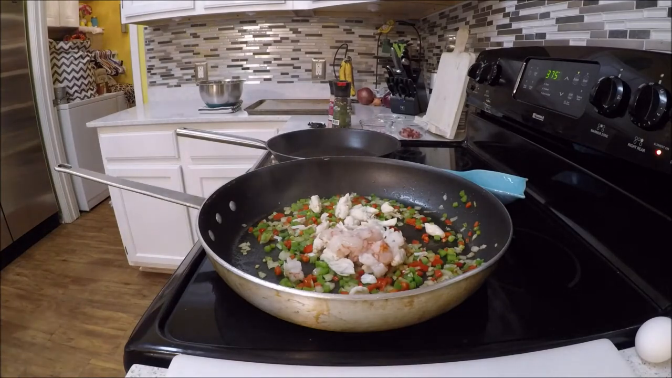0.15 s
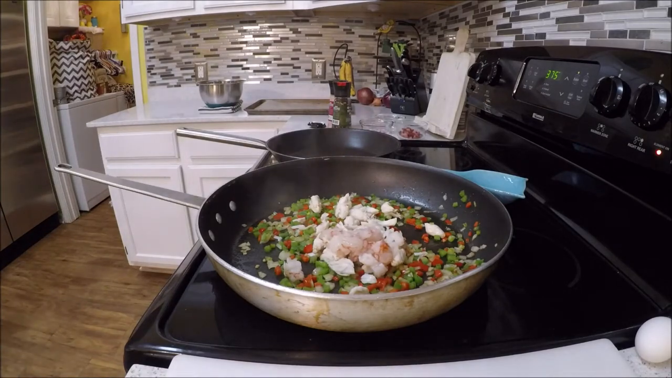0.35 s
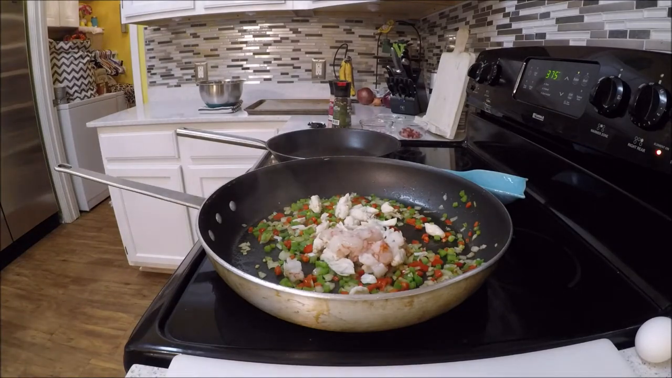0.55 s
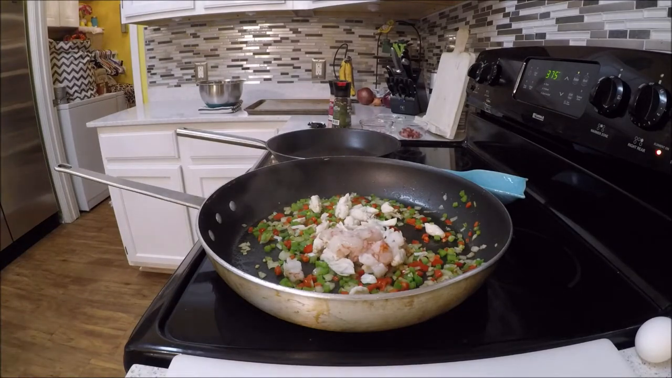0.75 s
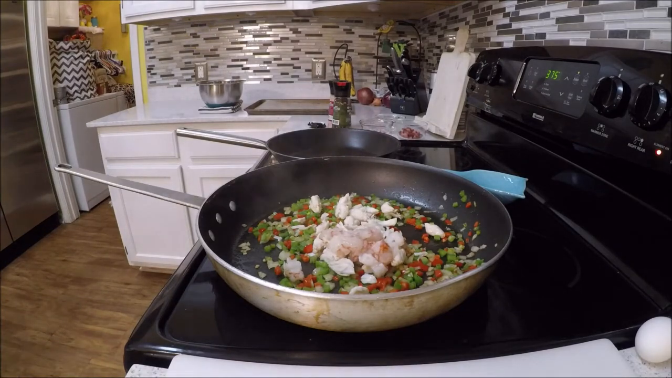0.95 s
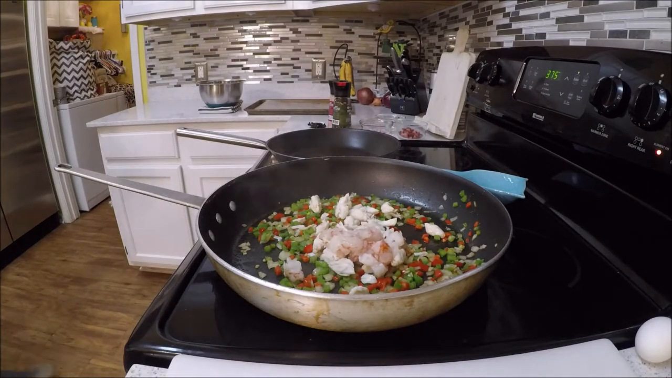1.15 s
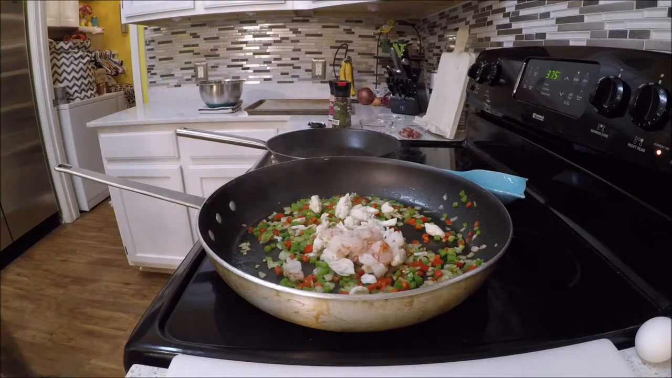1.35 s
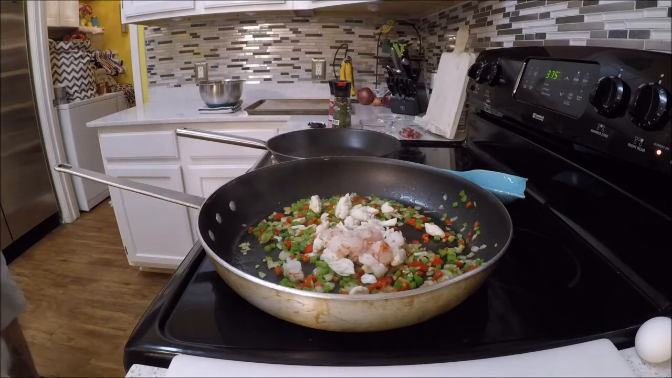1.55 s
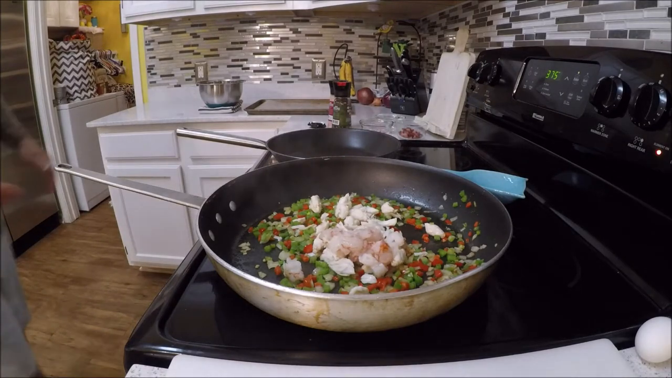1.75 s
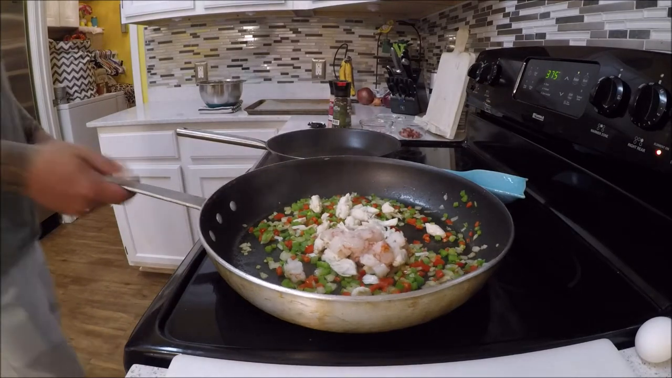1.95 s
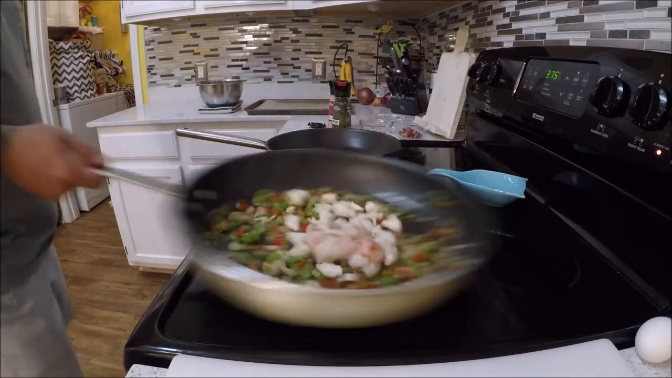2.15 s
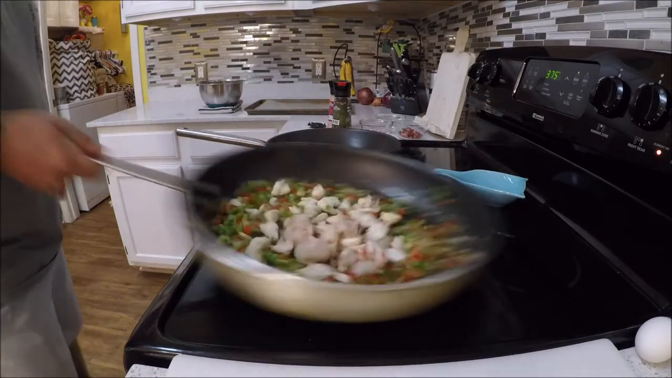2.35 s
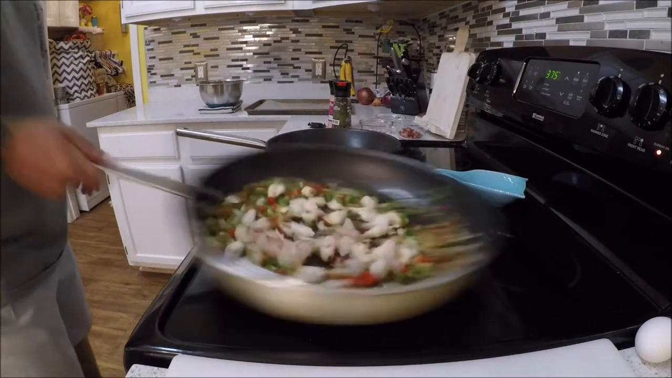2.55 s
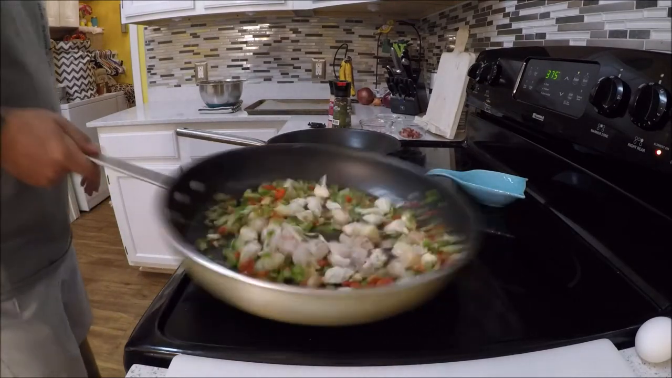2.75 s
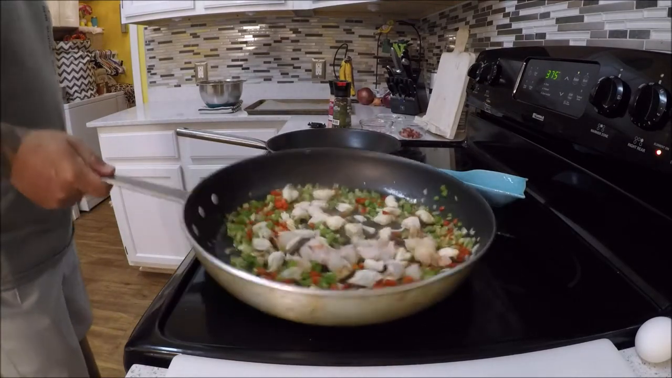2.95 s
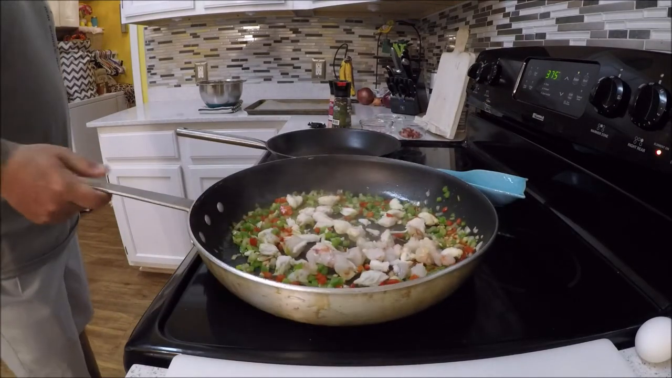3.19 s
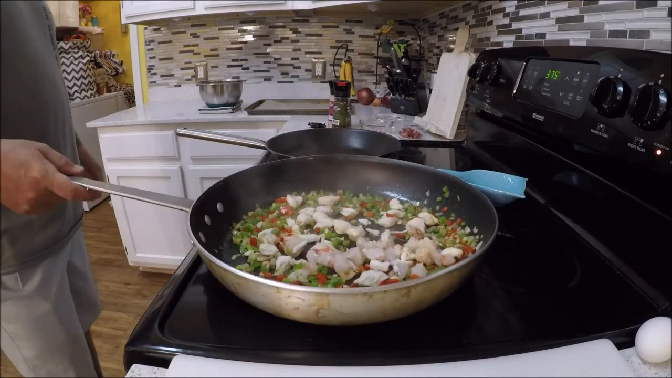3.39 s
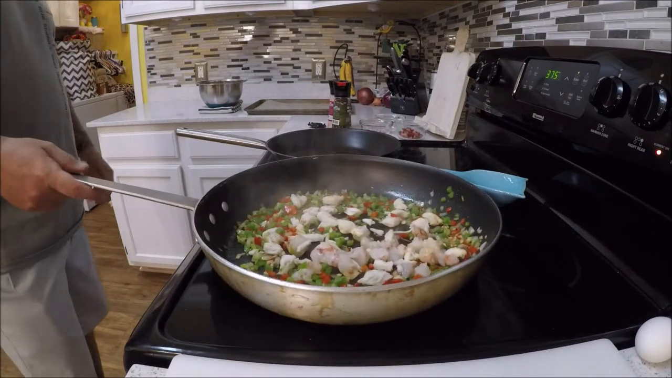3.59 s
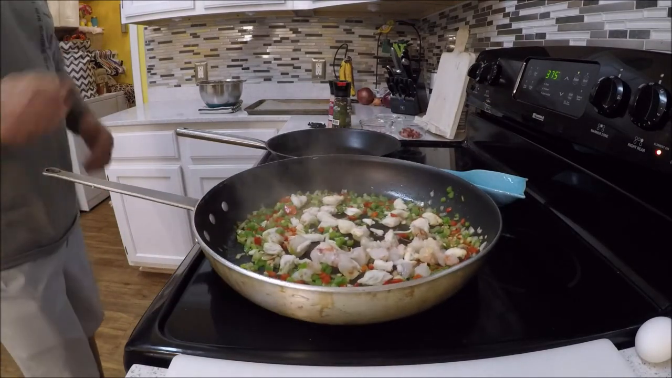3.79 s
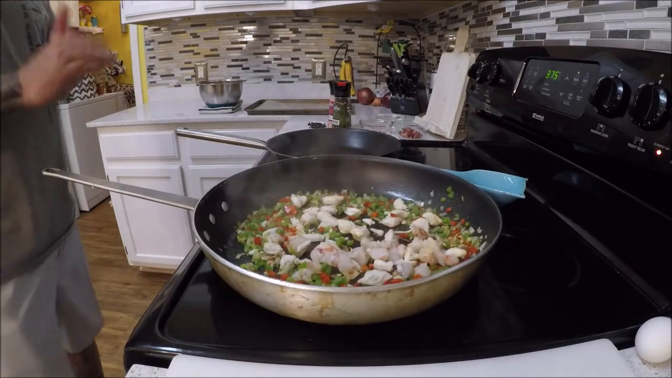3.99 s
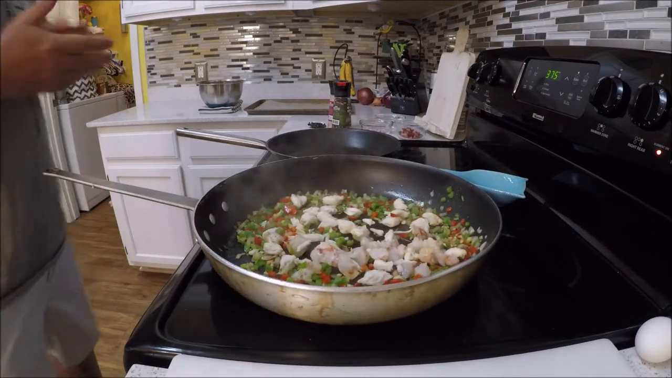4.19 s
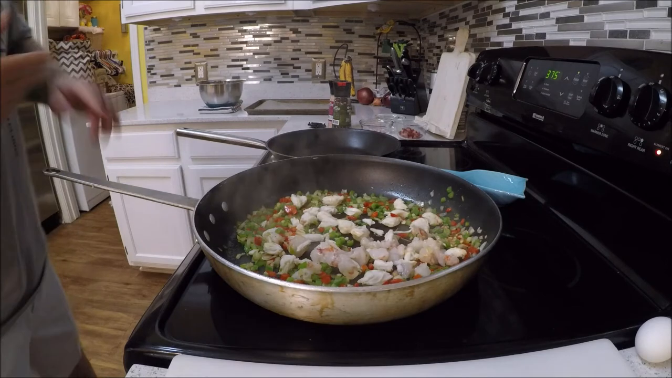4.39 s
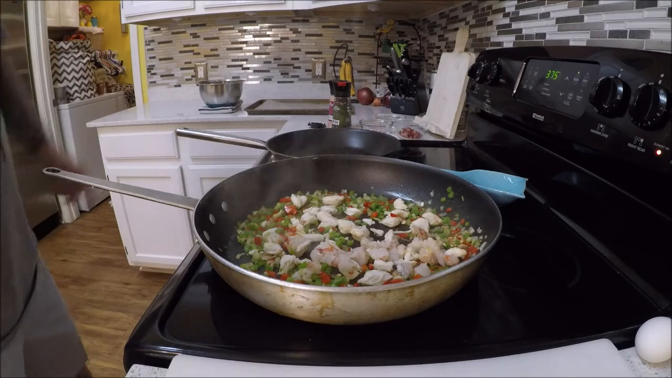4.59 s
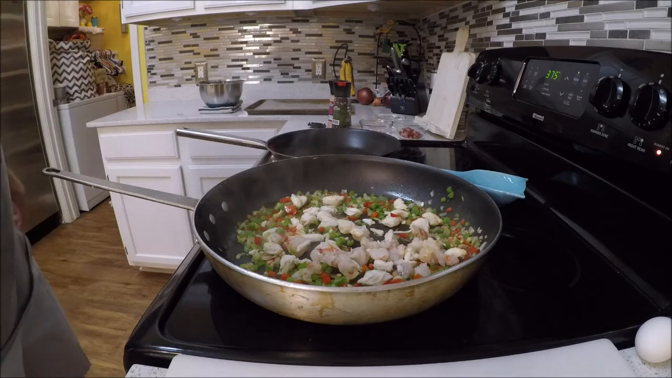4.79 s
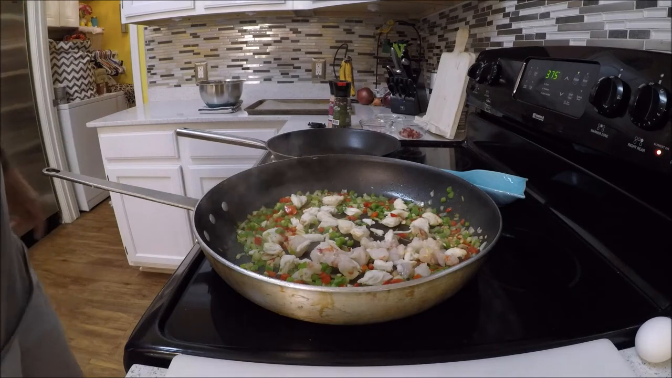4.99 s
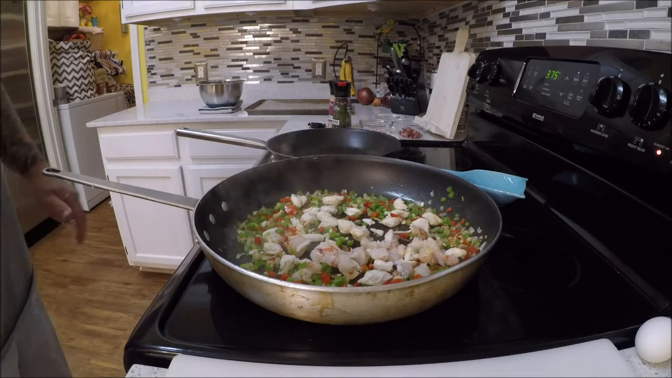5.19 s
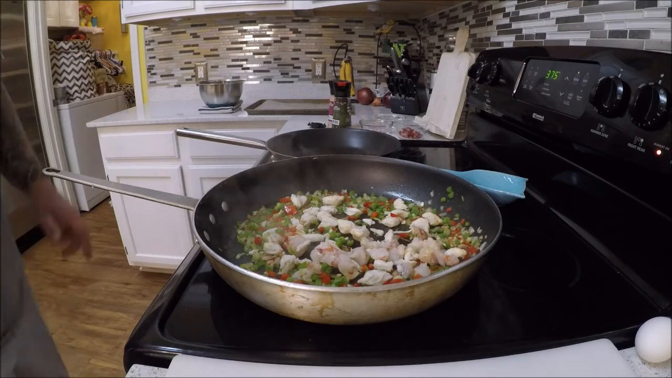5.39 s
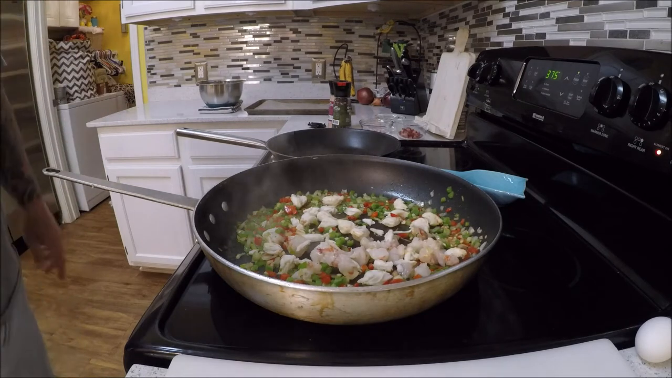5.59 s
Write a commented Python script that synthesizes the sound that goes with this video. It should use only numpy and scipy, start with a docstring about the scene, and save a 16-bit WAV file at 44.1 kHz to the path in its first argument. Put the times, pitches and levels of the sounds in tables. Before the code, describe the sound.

Shrimp and vegetables sizzle steadily in a skillet over the low hum of a kitchen fan. Something hard clatters across the room and a few soft steps follow. Then the pan is shaken on the glass stove top, knocking and scraping as the sizzle flares, and lands with a crack and a metallic boom. The frying carries on, with one more faint step. The stereo microphone is close to the stove.

```python
"""A kitchen, a stereo microphone close to a glass-top stove. Shrimp and vegetables sizzle in a skillet,
steam bubbles bursting in the oil, over the hum of a fan. Something hard is put down across the room,
and the cook takes a few soft steps. From about 2 s the skillet knocks and scrapes to and fro on the
glass and the sizzle flares. Just after 3 s the pan lands with a crack that sets the stove's sheet metal
booming. The frying goes on through one more step, and near 4.6 s the sound cuts out for an instant."""
import sys
import numpy as np
from scipy import signal
from scipy.fft import rfft, irfft
from scipy.io import wavfile
from scipy.ndimage import uniform_filter1d

SR = 44100
rng = np.random.default_rng(int(sys.argv[2]) if len(sys.argv) > 2 else 0)


def materialize(psi):
    """Save the field psi as 16-bit PCM at rate SR to the path in sys.argv[1].

    A 1-D psi becomes a single channel; in a 2-D psi each row is a channel.
    """
    bounded = np.clip(np.atleast_2d(psi).T, -1, 1)
    quanta = np.round(bounded * 32767).astype(np.int16)
    wavfile.write(sys.argv[1], SR, quanta)


N = 248724
T = np.arange(N) / SR
HZ = np.fft.rfftfreq(N, 1 / SR)

# the colour of frying: (frequency [Hz], level [dB per Hz])
SIZZLE_SPECTRUM = [(300, -32), (500, -16), (700, -16), (1200, -20), (1550, -10), (2000, -6.5), (3300, -2),
                   (5100, -2), (5950, 3), (6900, -2.5), (7750, -7), (8500, -15), (10500, -20.5),
                   (13000, -20.5), (15200, -30)]
# stereo width of the frying at the microphone: (frequency [Hz], side over mid [dB])
SIZZLE_WIDTH = [(60, -3), (99, -4), (160, -13), (270, -13), (450, -2), (740, 5.5), (1220, -6.5),
                (2010, -9.5), (3330, -19), (5500, -8), (9080, 0), (15000, -12.5)]
# stereo width of the room's reflections: (frequency [Hz], side over mid [dB])
ROOM_WIDTH = [(40, -24), (80, 0), (140, -15), (280, -14), (600, -8.5), (1300, -1), (3000, -5.5),
              (7000, -2.5)]

SHAKE_START_S, SHAKE_BUILD_S, SHAKE_HOLD_S, SHAKE_EASE_S = 1.93, 0.3, 0.49, 0.47
SET_DOWN_S = 3.13


def gain_of(db):
    """Decibels to amplitude."""
    return 10 ** (np.asarray(db) / 20)


def unit_rms(x):
    """Scales to rms 1."""
    return x / np.sqrt(np.mean(x ** 2) + 1e-20)


def unit_energy(x):
    """Scales to energy 1."""
    return x / np.linalg.norm(x)


def curve_at(points, hz):
    """Reads a table on a log-frequency axis."""
    f, value = np.transpose(points)
    return np.interp(np.log(hz + 1), np.log(f + 1), value)


def ramp(s, start, length):
    """Goes from 0 to 1 over a length of time."""
    return np.clip((s - start) / length, 0, 1)


def add(mix, s, sound):
    """Mixes a sound in at s seconds."""
    part = mix[round(s * SR):][:len(sound)]
    part += sound[:len(part)]


def through(x, response):
    """Convolution, cut to the length of x."""
    return signal.fftconvolve(x, response)[:len(x)]


def coloured(x, spectrum):
    """Filters x by a spectrum, to rms 1."""
    hz = np.fft.rfftfreq(len(x), 1 / SR)
    return unit_rms(irfft(rfft(x) * gain_of(curve_at(spectrum, hz)), len(x)))


def low_cut(x, hz):
    """Small objects radiate almost no deep bass."""
    return signal.sosfilt(signal.butter(8, hz, "high", fs=SR, output="sos"), x + 1e-12)


def drift(rate_hz):
    """A slow random wander of rms 1."""
    return unit_rms(irfft(rfft(rng.standard_normal(N)) / (1 + (HZ / rate_hz) ** 4), N))


def clicks(per_s, spread_db, size=N):
    """Random clicks of uneven height, at rms 1."""
    height = gain_of(spread_db * np.minimum(rng.exponential(1, size), 6))
    return unit_rms(height * rng.choice([-1, 1], size) * (rng.random(size) < per_s / SR))


def puff(spectrum, decay_s):
    """A short burst of coloured noise that dies away."""
    t = T[:SR // 5]
    return coloured(rng.standard_normal(len(t)), spectrum) * np.exp(-t / decay_s)


def ringing(modes):
    """A struck object's modes, each starting from rest; the wider ones die sooner."""
    t = T[:SR]
    return unit_energy(sum(
        (-1) ** k * gain_of(db) * width * np.exp(-np.pi * width * t) * np.sin(2 * np.pi * hz * t)
        for k, (hz, width, db) in enumerate(modes)))


def kitchen_echo():
    """The room's response: each band dies at its own speed."""
    # reverberation: (frequency [Hz], t60 [s])
    decay_times = [(100, 1), (300, 0.59), (1000, 0.48), (3500, 0.51), (8000, 0.052), (16000, 0.023)]
    hz, t, bands = signal.stft(rng.standard_normal(SR), SR, nperseg=256)
    decay = 1000. ** (-t / curve_at(decay_times, hz)[:, None])
    return unit_energy(signal.istft(bands * decay, SR, nperseg=256)[1])


def stereo(mid, width, left_db):
    """Scattered reflections make the microphone's two channels differ."""
    scatter = rfft(rng.standard_normal(N) * np.exp(-T / 0.0108))
    side = irfft(rfft(mid) * scatter / abs(scatter) * gain_of(curve_at(width, HZ)), N)
    return np.array([(mid + side) * gain_of(left_db / 2), (mid - side) * gain_of(-left_db / 2)])


def vigour(s):
    """How hard the pan is shaken, 0-1: it builds, holds and eases off."""
    ease_from_s = SHAKE_START_S + SHAKE_BUILD_S + SHAKE_HOLD_S
    return ramp(s, SHAKE_START_S, SHAKE_BUILD_S) - ramp(s, ease_from_s, SHAKE_EASE_S)


def bubbles():
    """Thousands of steam bubbles burst each second, a few spit, and the room blurs the rest to a hiss."""
    bursts = clicks(per_s=7000, spread_db=3.2)
    spits = gain_of(-12) * clicks(per_s=160, spread_db=2.8)
    hiss = gain_of(4) * rng.standard_normal(N)
    return coloured(bursts + spits + hiss, SIZZLE_SPECTRUM)


def sizzle():
    """Close by, the frying flares with the shake, which thins out the large, lower bubbles."""
    rest_db, flare_db, fresh_db = -31, 8.5, 0.5
    heaped_db, spread_db, shaken_db = 1.1, -3, -1  # large bubbles, by how the wet food lies
    # set down again, the freshly turned food fries harder for a while
    fresh = ramp(T, SET_DOWN_S, length=0.22) * np.exp(-np.maximum(T - SET_DOWN_S, 0) / 0.8)
    level_db = rest_db + flare_db * vigour(T) + fresh_db * fresh
    spread = ramp(T, SHAKE_START_S + SHAKE_BUILD_S, length=0.055)
    large_db = heaped_db + (spread_db - heaped_db + shaken_db * vigour(T)) * spread
    mid = bubbles()
    side = irfft(rfft(bubbles()) * gain_of(curve_at(SIZZLE_WIDTH, HZ)), N)
    pair = np.array([mid + side, mid - side])
    large_bubbles = irfft(rfft(pair) / (1 + (HZ / 4500) ** 6), N)
    flutter_db = 0.5 * drift(rate_hz=25)
    return (pair + (gain_of(large_db) - 1) * large_bubbles) * gain_of(level_db + flutter_db)


def fan():
    """The kitchen fan, a steady bed: wavering tones in a low rush of air."""
    # its hum: (frequency [Hz], level [dB])
    tones = [(172, -51), (204.6, -42.5), (238, -55), (393, -56), (407, -52)]
    # its rush of air: (frequency [Hz], level [dB per Hz])
    air_spectrum = [(30, -51), (105, -36), (145, 6.5), (190, 4.5), (245, 4), (320, -1.5), (410, 2),
                    (480, -7), (800, -8), (1500, -9.5), (4000, -33)]
    hum = np.zeros(N)
    for hz, db in tones:
        amplitude = np.sqrt(2) * gain_of(db + 1.9 * drift(rate_hz=3.5))
        hum += amplitude * np.sin(2 * np.pi * hz * T + 0.56 * drift(rate_hz=0.94))
    air = gain_of(-44.5) * coloured(rng.standard_normal(N), air_spectrum)
    return stereo(gain_of(0.3) * hum + air, ROOM_WIDTH, left_db=-1.8)


def clatter():
    """Across the room a hard thing lands and rattles; it arrives echoing, without the highest treble."""
    # its bounces: (time [s], relative level [dB])
    bounces = [(0.3117, -8.5), (0.3233, -2), (.336, -8), (.370, -9.5), (.403, -7.5)]
    # its ring: (frequency [Hz], width [Hz], level [dB])
    modes = [(289, 49, -1.5), (530, 51, -5.5), (796, 56, 2), (855, 57, 1.5), (1133, 97, 0), (1420, 65, -8),
             (1932, 46, 1), (2010, 62, -9), (2700, 67, -14), (3500, 39, -4.5), (5980, 51, 0)]
    # the noise of contact: (frequency [Hz], level [dB per Hz])
    contact_spectrum = [(100, -32), (145, 0), (300, -6), (420, -0.5), (620, -5), (800, -9), (1000, -0.5),
                        (1200, -1.5), (2000, -1.5), (3400, -4), (4900, -16), (6000, -23), (7500, -40),
                        (14000, -60)]
    t, blows = T[:SR], np.zeros(N)
    for s, db in bounces:
        contact = unit_energy(coloured(rng.standard_normal(SR), contact_spectrum) * np.exp(-t / 0.0065))
        add(blows, s, gain_of(db) * (contact + gain_of(3.5) * ringing(modes)))
    in_room = low_cut(blows + through(blows, kitchen_echo()), hz=145)
    distant = signal.sosfilt(signal.butter(6, 6800, fs=SR, output="sos"), in_room)
    return stereo(gain_of(22.5) * unit_energy(distant), ROOM_WIDTH, left_db=-1.5)


def steps():
    """The cook's feet make dull, soft scuffs on the floor."""
    # footfalls: (time [s], level [dB], pitch [Hz], decay [s])
    footfalls = [(1.43, -44, 1000, 0.35), (1.715, -29, 240, 0.031), (1.724, -45, 900, 0.039),
                 (4.17, -41, 300, 0.082)]
    t, scuffs = T[:SR], np.zeros(N)
    for s, db, hz, decay_s in footfalls:
        spectrum = [(hz / 8, -40), (hz / 2, -4), (hz, 0), (hz * 2, -8), (hz * 8, -35)]
        envelope = (1 - np.exp(-t / 0.004)) * np.exp(-t / decay_s)
        add(scuffs, s, gain_of(db) * envelope * coloured(rng.standard_normal(SR), spectrum))
    return stereo(low_cut(scuffs, hz=134), ROOM_WIDTH, left_db=-1.0)


def knocks():
    """Each blow of the pan is a push on the glass, a crack of metal, a thud and the stove top's boom."""
    # pan on stove: (time [s], level [dB], pitch [Hz])
    blows = [(1.929, -22.5, 414), (1.957, -21, 200), (2.012, -13.5, 409), (2.0937, -4.5, 306),
             (2.223, -6.5, 412), (2.288, -17, 390), (2.426, -3.5, 356), (2.465, -14, 248), (3.072, -8, 346),
             (3.095, -20, 272), (3.109, -4.5, 152), (3.1203, 1, 214), (3.147, -9.5, 226),
             (3.178, -12.5, 171)]
    # the stove's top: (frequency [Hz], level [dB], t60 [s])
    stove_modes = [(148, 0.5, 0.27), (176, -10, 0.34), (218.3, 0, 0.46), (285, -42, 0.098), (413, -11, .3),
                   (489, -16.5, 0.43), (550, -28, 0.21)]
    # metal on glass: (frequency [Hz], level [dB per Hz])
    crack_spectrum = [(300, 3), (2000, 8.5), (4500, 1.5), (6100, 9.5), (8000, -23.5), (15000, -17)]
    # the dull thud: (frequency [Hz], level [dB per Hz])
    thud_spectrum = [(60, -22), (110, -12), (140, 18.5), (330, -1.5), (520, 2), (900, -3.5), (2000, -14),
                     (5000, -46)]
    weight_db = 13  # more boom once the pan's whole weight rests on the stove
    t, direct = T[:SR], np.zeros(N)
    boom = sum(gain_of(db) * 1000. ** (-t / t60) * np.sin(2 * np.pi * hz * t)
               for hz, db, t60 in stove_modes)
    for s, db, hz in blows:
        # hard, quick blows crack and slow ones boom
        octaves = np.log2(hz / 302)
        crack_db = -3 + 4 * db + 9.5 * octaves
        boom_db = -24.5 - 7 * octaves + weight_db * (s > SET_DOWN_S)
        push = np.sin(2 * np.pi * hz * t) * np.exp(-t * hz / 1.31)
        add(direct, s, gain_of(db) * (push + gain_of(boom_db) * boom))
        add(direct, s, gain_of(db + crack_db) * puff(crack_spectrum, decay_s=0.0027))
        add(direct, s, gain_of(db - 13) * puff(thud_spectrum, decay_s=0.026))
    in_room = low_cut(direct + gain_of(-15.5) * through(direct, kitchen_echo()), hz=129)
    return stereo(in_room, ROOM_WIDTH, left_db=-2.0)


def friction(tilt_db_per_octave):
    """One second of tiny slips between pan and glass; the ring shifts with where the pan touches."""
    # the skillet's ring: (frequency [Hz], width [Hz], level [dB])
    pan_modes = [(417, 53, -25), (493, 52, 2), (776, 63, -2), (947, 50, 3), (1300, 180, 5.5),
                 (1505, 190, 2.5), (2180, 59, -23), (3490, 150, -5)]
    # rubbing on glass: (frequency [Hz], level [dB per Hz])
    scrape_spectrum = [(90, -43), (140, 1), (280, 5), (430, 7.5), (630, -2), (800, 3), (1050, -12),
                       (1300, -1), (1850, -6.5), (3000, -7), (4200, -11.5), (6000, -9), (7800, -45),
                       (13000, -52)]
    slips = clicks(per_s=6000, spread_db=4.5, size=SR)
    shifted = [(hz * (1 + 0.053 * rng.standard_normal()), width, db) for hz, width, db in pan_modes]
    ring = gain_of(-3) * unit_rms(through(slips, ringing(shifted)))
    rub = coloured(slips, scrape_spectrum)
    return coloured(rub + ring, [(250, 0), (4000, 4 * tilt_db_per_octave)])


def shaking():
    """Each stroke scrapes the glass and slides wet food onto hot metal; then the pan chatters to rest."""
    # pushes and pulls: (time at fastest [s], scrape level [dB], half length [s], hiss level [dB])
    strokes = [(2.07, -23.5, 0.022, -25), (2.183, -18, 0.018, -35), (2.278, -22, 0.023, -26),
               (2.385, -16.5, 0.013, -27), (2.476, -18.5, 0.026, -22.5), (2.59, -19, 0.025, -17.5),
               (2.681, -19, .025, -23), (2.788, -20.5, .022, -23), (2.85, -25.5, 0.06, -30),
               (2.998, -24, 0.012, -33), (3.08, -25, 0.015, -32)]
    # the settling pan: (frequency [Hz], level [dB per Hz])
    chatter_spectrum = [(100, -23), (150, 4), (290, -12), (380, -6), (650, -15.5), (900, -8), (1200, -9.5),
                        (1500, -16), (2200, -18.5), (5000, -28), (12000, -65)]
    gentle_tilt, brisk_tilt = -8.5, 0.87  # dB per octave: a gentle stroke is duller
    chatter_hold_s, chatter_fall_db_per_s = 0.15, 253
    t, scrape, hiss = T[:SR] - 0.5, np.zeros(N), np.zeros(N)
    for s, scrape_db, half_length_s, hiss_db in strokes:
        tilt = gentle_tilt + (brisk_tilt - gentle_tilt) * vigour(s)
        speed = np.exp(-(t / half_length_s) ** 2 / 2)
        add(scrape, s - 0.5, gain_of(scrape_db) * speed * friction(tilt))
        steam = coloured(clicks(per_s=12000, spread_db=0.5, size=SR), SIZZLE_SPECTRUM)
        add(hiss, s - 0.5, gain_of(hiss_db) * speed ** 2 * steam)
    chatter = coloured(clicks(per_s=2200, spread_db=-1.5), chatter_spectrum)
    chatter_db = -28 - chatter_fall_db_per_s * np.maximum(T - SET_DOWN_S - chatter_hold_s, 0)
    scrape += (T > SET_DOWN_S) * gain_of(chatter_db) * chatter
    in_room = low_cut(scrape + gain_of(-7) * through(scrape, kitchen_echo()), hz=118)
    return stereo(in_room, ROOM_WIDTH, left_db=-4.5) + stereo(hiss, SIZZLE_WIDTH, left_db=1.5)


def cabinet_rumble():
    """The stove's cabinet booms under the landing pan; a deep noise swells towards it and lingers."""
    # the deep noise: (frequency [Hz], level [dB per Hz])
    rumble_spectrum = [(12, -42), (20, -0.5), (48, -32), (65, -0.5), (81, -8), (125, -3.5), (160, -32),
                       (210, -39), (350, -120)]
    landing_s, boom_hz, t60, attack_s = 3.15, 77, 0.6, 0.012
    peak_s, rise_db_per_s, fall_db_per_s = 3.26, 28.5, 12.5
    t = np.maximum(T - landing_s, 0)
    envelope = (1 - np.exp(-t / attack_s)) * 1000. ** (-t / t60)
    boom = gain_of(-22) * envelope * np.sin(2 * np.pi * boom_hz * t)
    below_peak_db = np.maximum(rise_db_per_s * (peak_s - T), fall_db_per_s * (T - peak_s))
    swell = gain_of(np.maximum(-37.5 - below_peak_db, -83))
    left, right = (swell * coloured(rng.standard_normal(N), rumble_spectrum) for _ in "LR")
    return np.array([gain_of(2) * (boom + left), gain_of(9) * (boom + right)])


def scene():
    """The kitchen as it reaches the microphone by the stove."""
    return sizzle() + fan() + clatter() + steps() + shaking() + knocks() + cabinet_rumble()


def record(dry):
    """Gain control ducks after peaks and recovers slowly; overload clips; the sound briefly cuts out."""
    threshold_db, recovery_db_per_s, treble_edge_hz = -13.5, 12, 15200
    gap_start_s, gap_end_s, gap_db = 4.5768, 4.6095, -40.5
    power = uniform_filter1d(np.minimum(dry ** 2, 1).mean(0), size=130)
    power_db = 10 * np.log10(abs(power) + 1e-12)
    recovery_db = recovery_db_per_s * T
    held_db = np.maximum.accumulate(power_db + recovery_db) - recovery_db
    over_db = through(np.maximum(held_db - threshold_db, 0), np.ones(200) / 200)
    clipped = np.clip(dry / gain_of(0.7 * over_db), -1, 1)
    dropout = np.where((T < gap_start_s) | (T > gap_end_s), 1, gain_of(gap_db))
    low_pass = signal.firwin(255, treble_edge_hz, window=("kaiser", 9), fs=SR)
    return signal.oaconvolve(clipped * dropout, low_pass[None], "same")


dry = scene()
out = record(dry)
materialize(out)
```